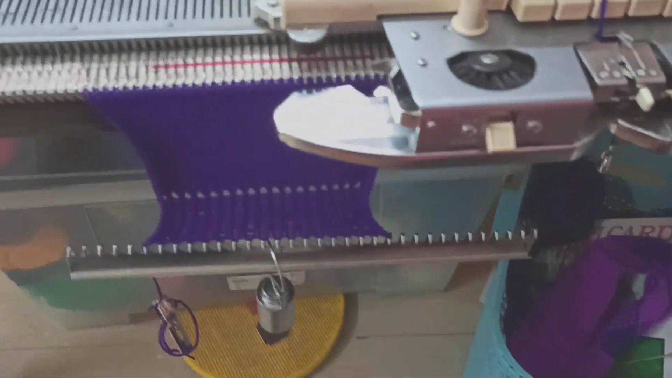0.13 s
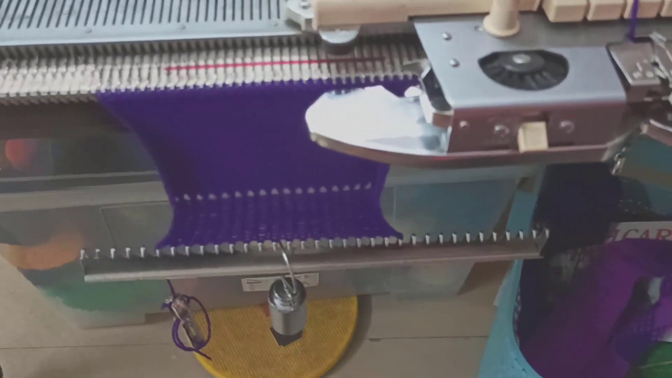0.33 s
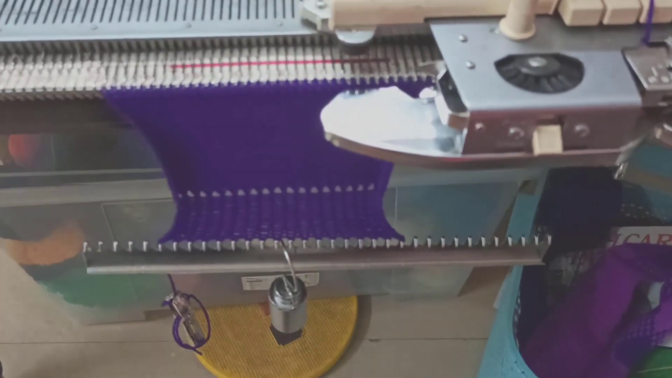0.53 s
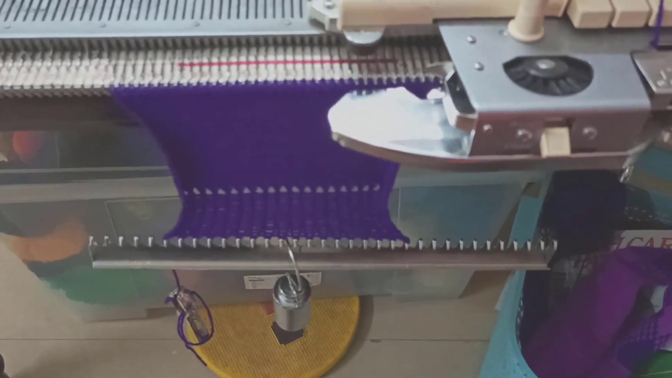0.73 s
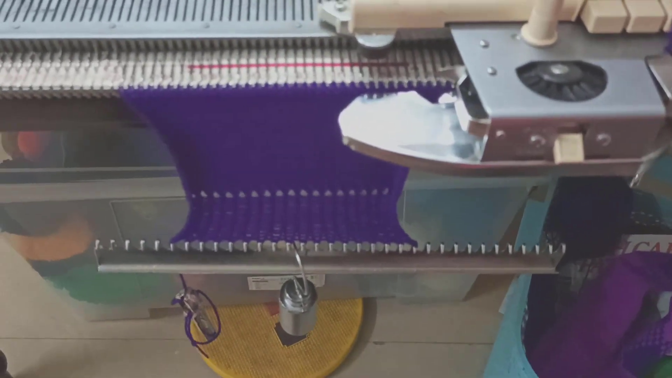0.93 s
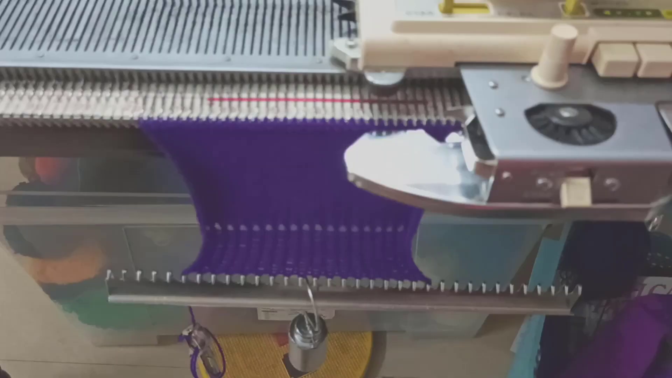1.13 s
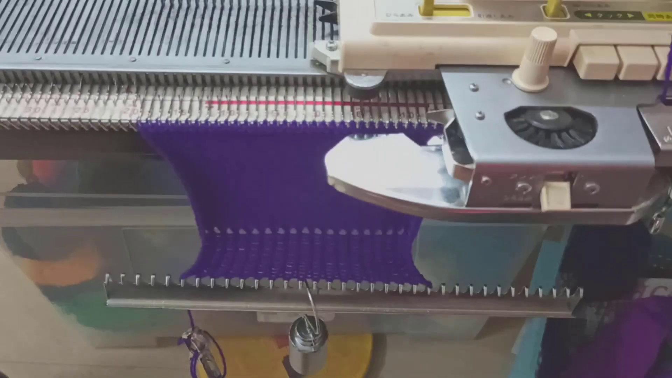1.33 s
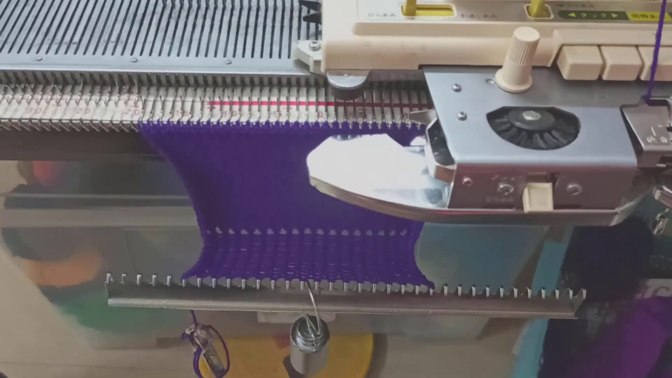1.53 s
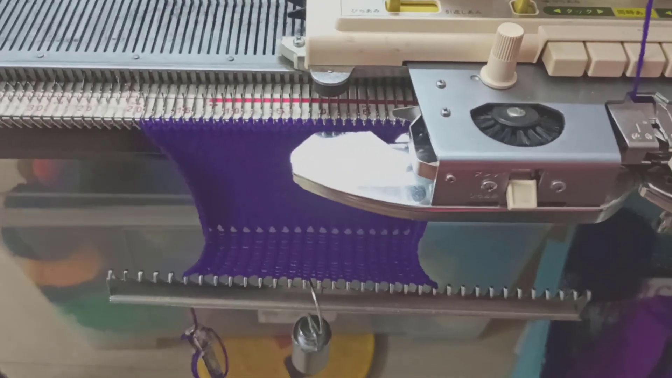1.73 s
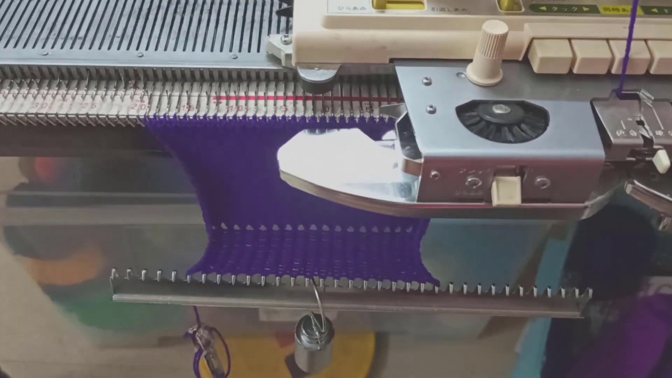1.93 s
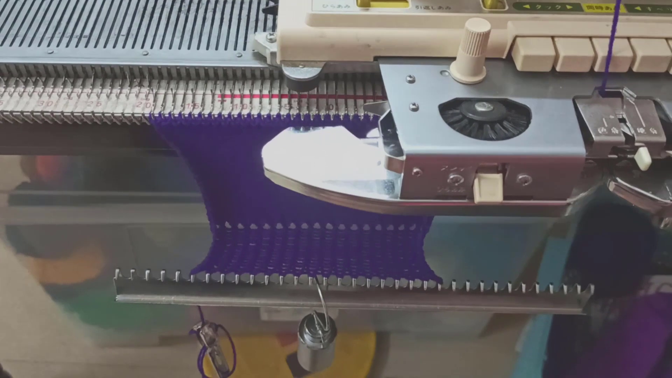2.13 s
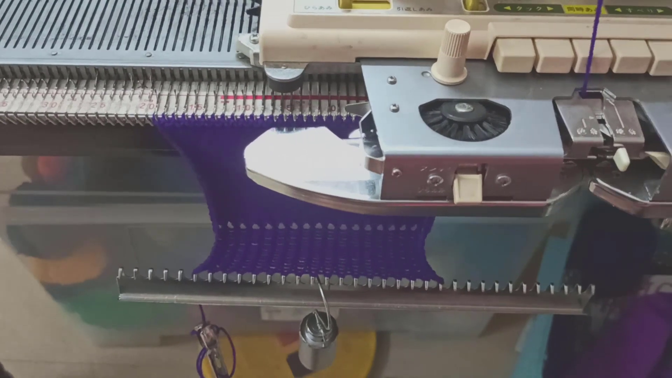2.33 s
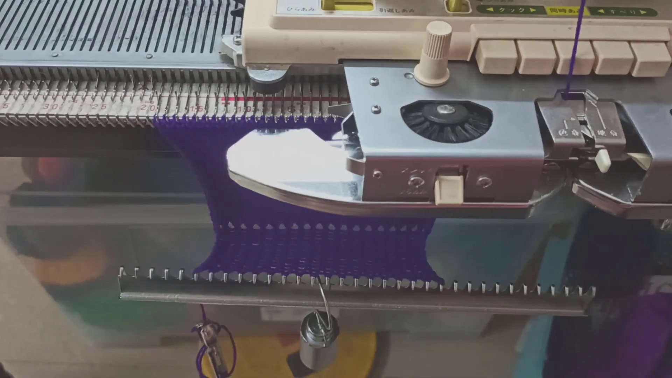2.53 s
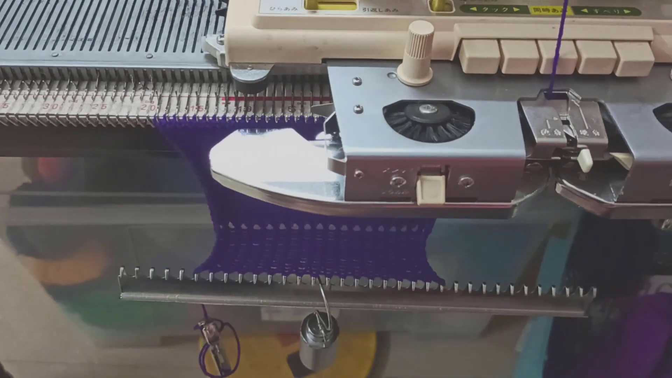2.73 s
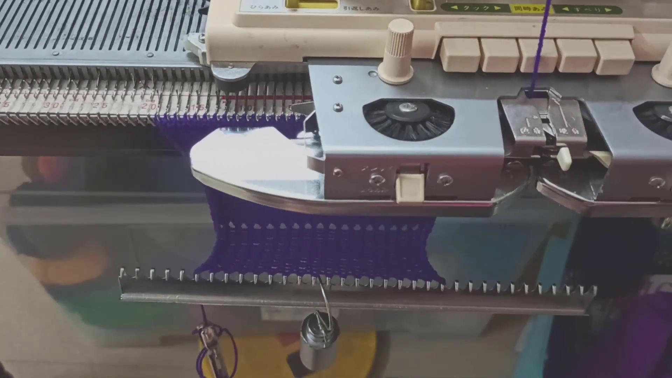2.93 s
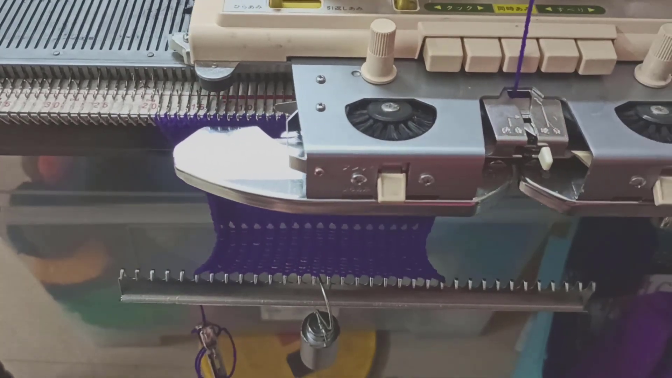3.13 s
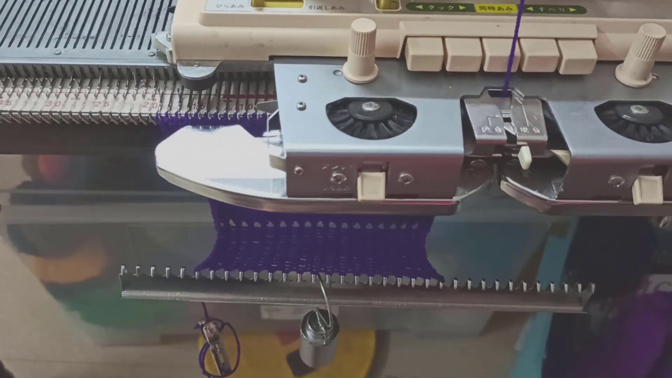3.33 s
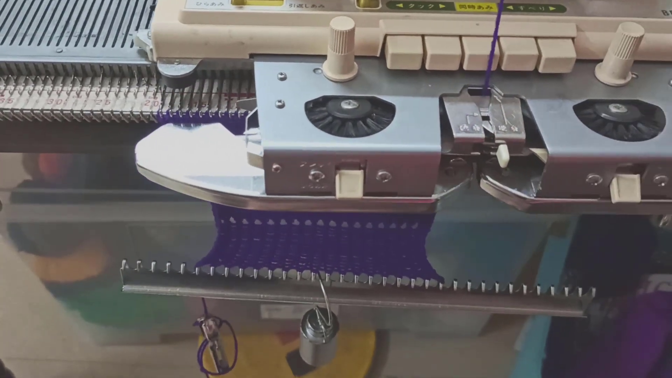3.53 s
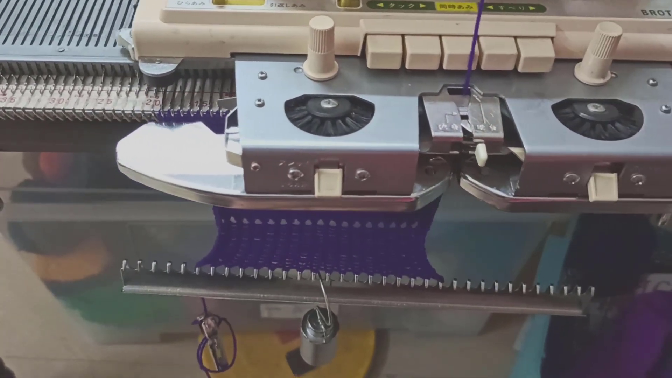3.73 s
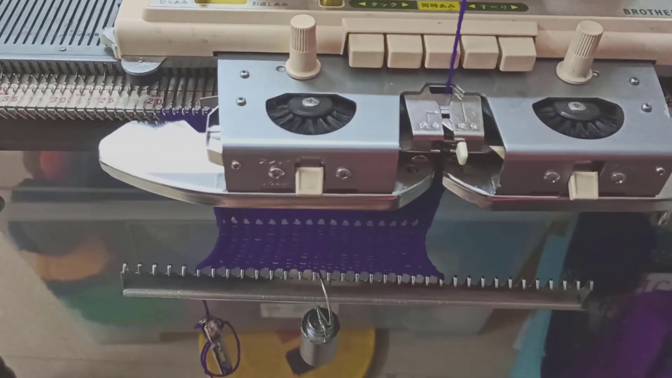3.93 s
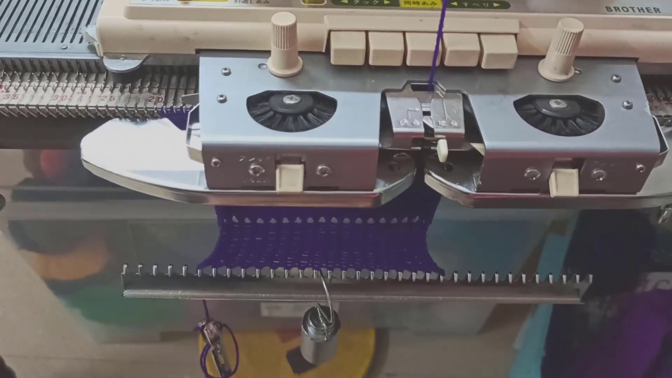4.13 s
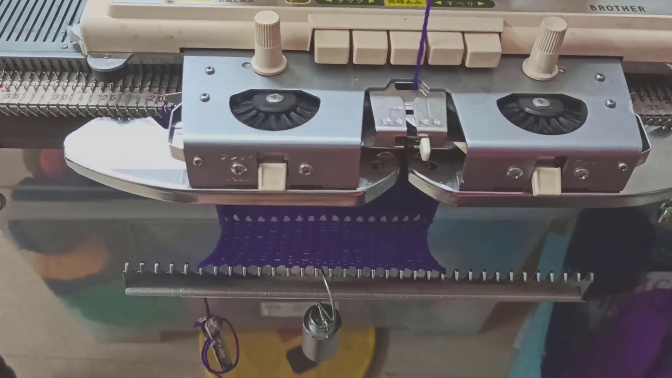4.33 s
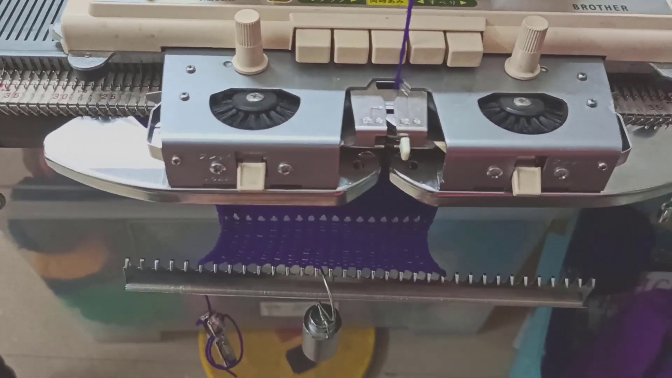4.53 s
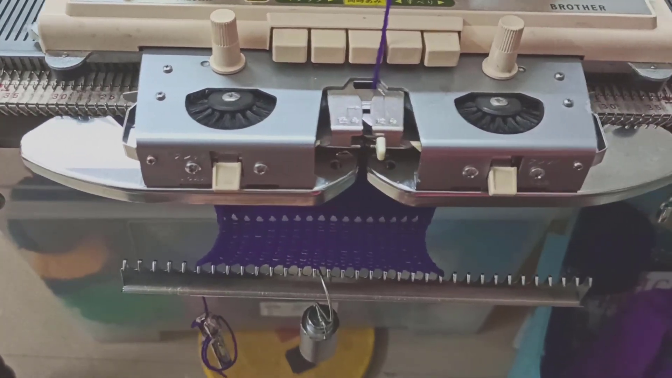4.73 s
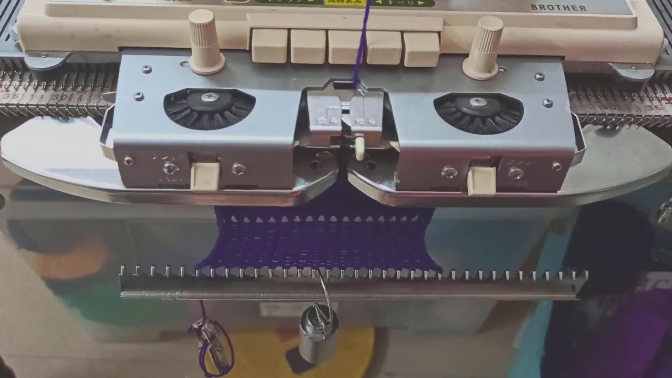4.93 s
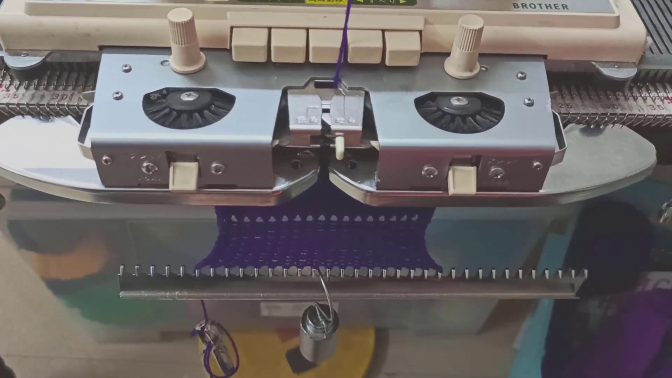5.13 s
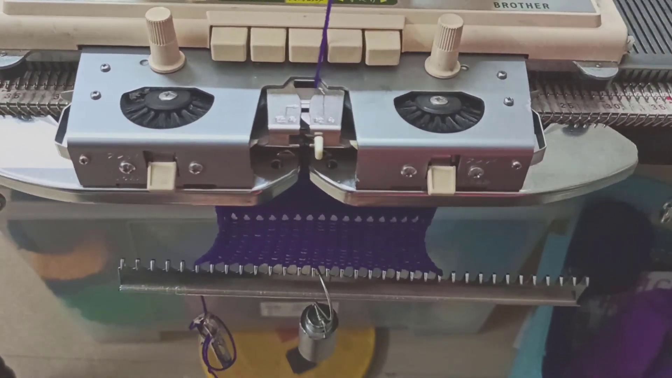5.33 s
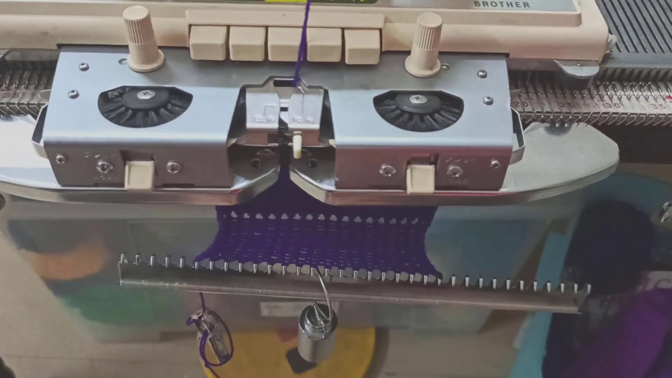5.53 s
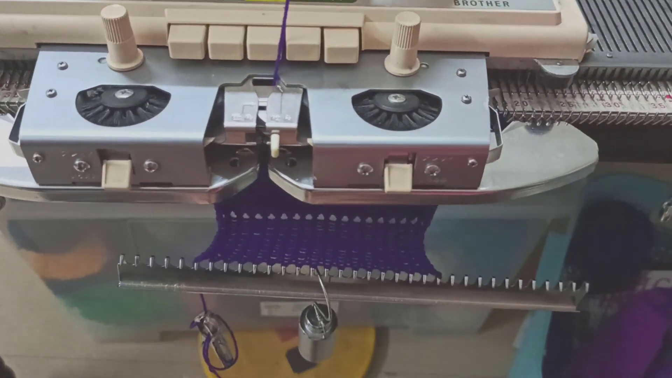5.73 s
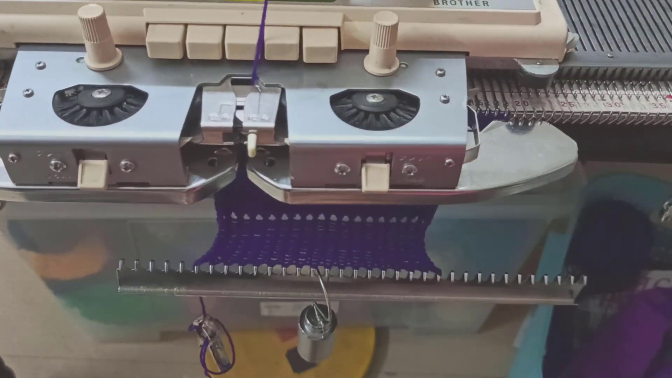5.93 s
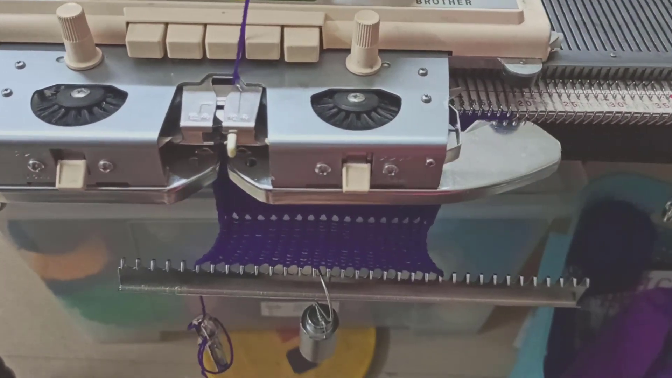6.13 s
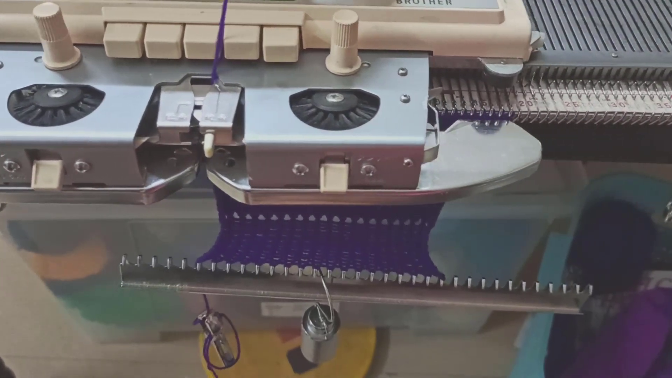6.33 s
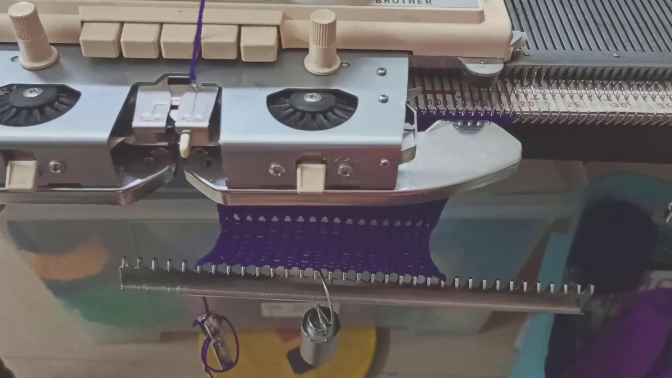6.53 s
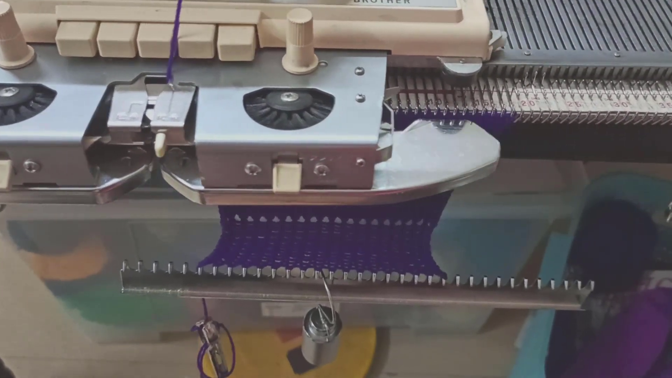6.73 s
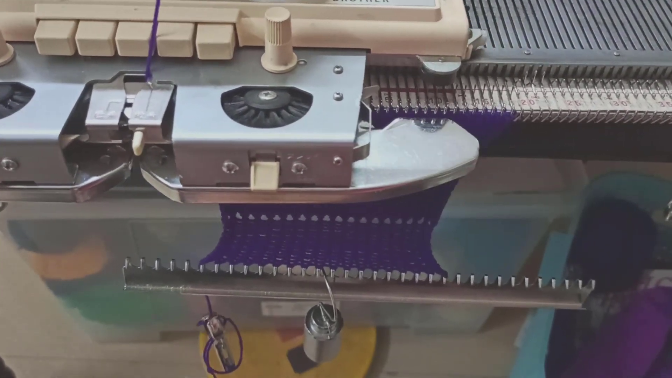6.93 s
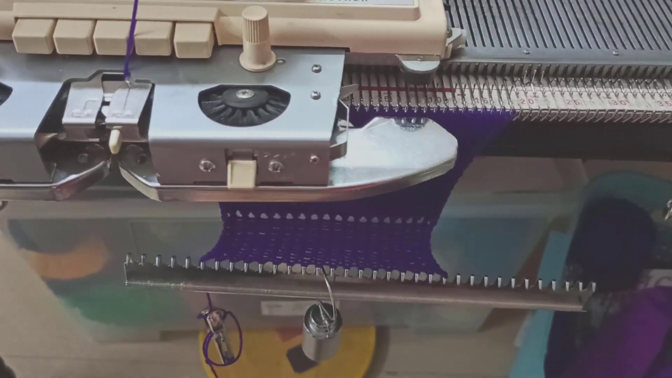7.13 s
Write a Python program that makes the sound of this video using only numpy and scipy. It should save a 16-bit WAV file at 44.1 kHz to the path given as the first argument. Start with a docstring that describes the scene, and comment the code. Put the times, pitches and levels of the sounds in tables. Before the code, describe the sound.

Motorized knitting machine carriage: one sharp clack, brief lull, humming slide with sparse ticks and squeaks, then about ten gritty needle clicks a second.

```python
"""A motor draws a knitting machine's carriage along its steel needle bed in a small room.
A latch snaps and the shell shimmers; the drive coasts to a rest, then rumbles off, swelling about once a second.
Single needles tick at the carriage edge, mostly from 2 s; rail hiss grows and a few friction tones squeak.
From 4.5 s the cams work about ten needles a second: noise tap, gritty scrape, ringing knock, rattle.
Two more latches snap near 6.5 s and faint squeaks return, over needle rustle and room tone."""
import sys
import numpy as np
from scipy import signal
from scipy.fft import rfft, irfft
from scipy.io import wavfile

SR = 44100
rng = np.random.default_rng(int(sys.argv[2]) if len(sys.argv) > 2 else 0)


def dump(signal):
    """Clip the signal to [-1, 1] and save it as 16-bit WAV at the path in sys.argv[1]."""
    limited = np.clip(np.atleast_2d(signal).T, -1, 1)
    pcm = np.round(limited * 32767).astype(np.int16)
    wavfile.write(sys.argv[1], SR, pcm)


N = 317520
TIME = np.arange(N) / SR

# Table levels are relative: the source functions add their own gains.
# needles tapping the cam, then scraping up it: (time [s], tap level [dB], scrape level [dB])
TAPS = [(4.4703, -29.5, -45.5), (4.5704, -32, -42.5), (4.667, -33, -45), (4.762, -32, -46),
        (4.859, -33, -45), (4.959, -30.5, -42.5), (5.053, -38, -41), (5.163, -27.5, -46), (5.253, -33, -45),
        (5.3441, -32, -47), (5.449, -31, -42), (5.5455, -31, -44.5), (5.6255, -28.5, -48),
        (5.736, -38, -45.5), (5.8282, -34, -48), (5.921, -30, -46.5), (6.02, -27.5, -45),
        (6.1204, -31, -48.5), (6.217, -36, -47), (6.3075, -29.5, -48), (6.4112, -32, -44.5),
        (6.4893, -27, -43.5), (6.594, -24, -47), (6.6855, -33, -46), (6.7795, -35, -45), (6.876, -34, -50),
        (6.97, -32, -46), (7.0712, -38, -42.5), (7.1589, -35, -44)]
# stroke-end knocks: (time [s], knock level [dB], ring pitch [Hz], treble [dB], rattle level [dB])
KNOCKS = [(4.5055, -34, 4160, 12, -41.5), (4.607, -31, 4030, 8, -39.5), (4.7003, -26.5, 4340, -3.5, -40),
          (4.795, -25, 4370, 0, -47), (4.898, -25, 4400, 0, -44), (4.9916, -27, 4010, 5.5, -46),
          (5.0921, -28, 4150, 5.5, -43), (5.1882, -27.5, 4700, 5, -50), (5.2831, -27, 4200, 4, -49.5),
          (5.376, -22.5, 3590, 2.5, -42), (5.4747, -30, 4300, 5, -41), (5.5582, -26, 3540, 2, -53),
          (5.6635, -31.5, 3820, 11, -49), (5.7535, -28.5, 3660, 0.5, -48), (5.8428, -29, 4540, 6, -45),
          (5.9379, -31, 3860, -3, -41), (6.0364, -26, 3900, -2, -53), (6.1303, -27.5, 4020, 3.5, -57),
          (6.2295, -26.5, 3930, 0, -46.5), (6.3213, -25, 4100, -0.5, -51), (6.4185, -28, 4070, 2, -42.5),
          (6.5077, -29.5, 4730, 11, -38), (6.6023, -23.5, 4330, -6, -35), (6.6986, -23, 3420, 1.5, -37),
          (6.794, -28.5, 3490, 6, -36), (6.89, -27, 3440, 3, -40), (6.985, -29, 4100, 7, -36.5),
          (7.0815, -30.5, 4160, 9, -40), (7.1768, -28, 4080, 1, -43)]
# rustle of needles, growing as more lie under the cams: (time [s], level [dB])
RUSTLE = [(0.0, -69), (0.36, -78.5), (0.52, -100.5), (1.06, -94.5), (1.36, -82), (1.98, -82), (2.81, -61),
          (3.27, -62.5), (3.43, -55.5), (4.05, -53), (4.32, -52), (4.45, -59.5), (4.69, -49.5), (5.52, -47),
          (6.24, -48), (6.6, -45.5), (7.2, -54)]
# cam work spectrum: (frequency [Hz], left [dB], right [dB])
CAM_COLOUR = [(352, -25.5, -26.5), (567, -22, -27.5), (707, -17.5, -21), (932, -16.5, -15),
              (1350, -35.5, -31.5), (1630, -20.5, -18.5), (2420, -9.5, -10), (2615, -14, -13),
              (3800, -13.5, -1.5), (4747, -16, 0.5), (4640, -13, -10), (5960, -25, -7.5), (6376, -3, 1),
              (8350, -11.5, -22.5), (11740, -17.5, -16), (15300, -9.5, -15)]
# ringing of steel bed and needles: (frequency [Hz], level [dB], t60 [s])
BED_MODES = [(3460, -12, 0.035), (3623, -3, 0.048), (4030, -7.5, 0.035), (4370, -11.5, 0.13),
             (4680, -9, 0.045), (5370, -9.5, 0.02), (6097, -7, 0.057), (7380, -4, 0.025)]
# latches snapping over: (time [s], level [dB], treble [dB], top octave [dB], left-right [dB],
# ring [dB], chatter [s])
LATCHES = [(0.0769, -14.5, -1, -2.5, 1, -19.5, 0.0013), (6.5173, -25.5, 6.5, 6, -27, -16, 0.0036),
           (6.5805, -21, 3, -1, -7.5, -21.5, 0.0049)]
# latch spectrum: (frequency [Hz], left [dB], right [dB])
LATCH_COLOUR = [(350, -22.5, -27), (702, -31, -29), (1180, -24, -14.5), (1650, -15, -20), (1950, 1.5, -13),
                (2440, -13, -16.5), (3160, -18.5, -11), (4003, -13.5, -0.5), (5300, -22, -3.5),
                (5740, -11, -11.5), (6250, -2.5, 2), (7700, 2.5, -8.5), (8160, -17.5, -8),
                (12060, -17.5, -14.5), (14940, -13.5, -17.5)]
# ringing of the carriage shell: (frequency [Hz], level [dB], t60 [s])
SHELL_MODES = [(1885, 3, .5), (1965, 8, .6), (2040, -2, .4), (3850, -9, .35), (4480, -4, .35),
               (6255, -6, .28), (6880, -8, .4), (7165, -7, .4), (7580, 4, .22)]
# loudest single-needle ticks: (time [s], level [dB], hardness as top octave [dB])
TICKS = [(0.4666, -45.5, -5), (1.196, -46, -19.5), (1.7394, -44.5, -26), (2.0867, -51.5, -13),
         (2.133, -57, -14), (2.1889, -48, -20), (2.2285, -50, -17), (2.2844, -47, -16),
         (2.2916, -49.5, 4.5), (2.378, -40.5, -10), (2.4053, -53.5, 14), (2.5551, -36.5, -4),
         (2.6596, -33, -10), (2.761, -43.5, -9), (2.77, -34, -3), (2.8653, -32.5, -3), (2.9784, -35.5, 0),
         (3.0376, -38.5, -8), (3.2192, -35, 4), (3.2794, -35, -16), (3.3232, -37.5, 1.5), (3.432, -37, 0),
         (3.4647, -38, -5), (3.5366, -34, 4), (3.5592, -37.5, 1), (3.6606, -37.5, -1), (3.7586, -34, 0.5),
         (3.802, -31, -4), (3.8593, -34, -2), (3.941, -37, -9), (3.966, -41, -1.5), (4.0239, -33, 0.5),
         (4.0687, -36.5, -1.5), (4.139, -32, -0.5), (4.218, -36, 2.5), (4.277, -28.5, -21),
         (4.2895, -40.5, 6), (4.3155, -33, -4), (4.3928, -36, -15), (5.067, -40, 1), (5.081, -42, -1),
         (6.105, -38.5, -5), (7.100, -34.5, -2.5)]
# tick spectrum: (frequency [Hz], left [dB], right [dB])
TICK_COLOUR = [(500, -46, -32), (1380, -40, -51), (2120, -16, -33), (3360, -16.5, -11.5),
               (4550, -29.5, -7.5), (6190, -14.5, -13.5), (6270, -7, 0), (7670, -22, -50),
               (12000, -20, -21), (13800, -5.5, -14), (15400, -20, -7)]
# squeaks, each a list of points on one unbroken glide: (time [s], pitch [Hz], level [dB])
SQUEAKS = [
    [(1.93, 1853, -75.5), (2.025, 2055, -68.5), (2.05, 1980, -62), (2.08, 1800, -66), (2.105, 1660, -59),
     (2.145, 1800, -69), (2.2, 1635, -60.5), (2.245, 1600, -70), (2.28, 1635, -58), (2.33, 1603, -73),
     (2.44, 1670, -59.5), (2.475, 1702, -52), (2.55, 1816, -62.5), (2.58, 1810, -78)],
    [(2.765, 1720, -74), (2.78, 1760, -61), (2.85, 1970, -62.5), (2.93, 2110, -66)],
    [(3.15, 1850, -76), (3.28, 1760, -73), (3.48, 1700, -73)],
    [(3.603, 1580, -71), (3.614, 1560, -48.5), (3.629, 1535, -54), (3.639, 1567, -74), (3.652, 1582, -53),
     (3.68, 1560, -74)],
    [(3.712, 1470, -55), (3.738, 1562, -43.5), (3.748, 1595, -36.5), (3.765, 1703, -38.5),
     (3.79, 1760, -43), (3.82, 1772, -39.5), (3.835, 1815, -53), (3.885, 1750, -62)],
    [(6.66, 1740, -65), (6.732, 1620, -59), (6.748, 1628, -41.5), (6.772, 1757, -40), (6.795, 1680, -37.5),
     (6.845, 1670, -52), (6.855, 1680, -64)],
    [(6.825, 1850, -57), (6.86, 2080, -42), (6.885, 2200, -56)],
]
# light touch rough, firm touch locked on pitch: (level [dB], waver [share of pitch])
SQUEAK_WAVER = [(-66, .055), (-58, .036), (-49, .018)]
# a rubbed needle singing: (time [s], pitch [Hz], level [dB], length [s])
SINGING = [(0.466, 4020, -46.5, 0.006), (2.37, 4340, -59.5, 0.16), (3.536, 6470, -39, 0.016),
           (3.556, 4300, -58, 0.1), (3.74, 4370, -54.5, 0.33), (4.683, 4330, -49, 0.14),
           (4.838, 4344, -50, 0.24), (5.08, 4360, -55, 0.26), (5.398, 4324, -51.5, 0.13),
           (5.625, 6140, -37.5, 0.018), (5.718, 6300, -36.5, 0.013), (5.808, 6250, -39, 0.013),
           (6.175, 6250, -46, 0.024), (6.933, 6200, -41, 0.014)]
# dull knocks of the casing: (time [s], level [dB])
CASING_KNOCKS = [(1.063, -61), (4.279, -52.5), (4.325, -59), (4.506, -57.5), (4.607, -66.5), (6.321, -60),
                 (6.582, -52), (6.602, -56)]
# casing spectrum: (frequency [Hz], left [dB], right [dB])
CASING_COLOUR = [(60, -15, -26), (250, -17, -16.5), (526, 0.5, 5.5), (610, -13, -17), (870, 2, 4),
                 (1170, 6, 4.5), (1430, -26, -5.5), (3100, -8, 2), (8000, -42, -56)]
# hiss of carriage on rail, rising until under way: (time [s], level [dB])
RAIL_HISS = [(0.0, -61.5), (0.33, -65), (0.57, -92), (1.07, -80), (1.25, -76), (1.68, -66.5), (2.95, -64),
             (3.2, -62.5), (3.6, -60.5)]
# rail spectrum: (frequency [Hz], left [dB], right [dB])
RAIL_COLOUR = [(385, -12, -15.5), (566.4, -18.5, -19), (709, -9, -11.5), (1100, -8, -10.5),
               (1370, -16, -17.5), (1770, -5, -6), (3140, -18.5, 0), (4110, -23.5, -1), (4496, -11, 6),
               (4820, -38.5, -9.5), (6520, -26, -21), (8100, -38.5, -35), (13930, -44, -29)]
# short rubs of the sliding carriage: (time [s], length [s], centre [Hz], level [dB])
RUBS = [(0.722, 0.13, 776, -71), (1.343, 0.13, 3500, -66), (1.586, 0.12, 860, -69),
        (2.178, 0.18, 790, -70.5), (2.387, 0.075, 4260, -55), (2.737, 0.19, 286, -64.5)]
# drive rumble as its load changes: (time [s], level [dB])
LOAD = [(0, -62), (1.2, -61.5), (1.9, -62.5), (2.4, -64.5), (3.0, -59), (3.6, -63), (4.6, -59), (5.4, -64),
        (6.2, -61), (7.2, -65.5)]
# motor hum: (frequency [Hz], level against rumble [dB])
HUM = [(121, -14.5), (200, -10)]
# rumble spectrum: (frequency [Hz], left [dB], right [dB])
RUMBLE_COLOUR = [(25, -22.5, -23), (50, -24.5, -27), (79.6, -4.5, -16), (98, -1.5, -6), (123.3, 4, -1.5),
                 (151, -4, -9), (196.8, 0.5, -2.5), (258.5, -10.5, -14.5), (350, -21.5, -21),
                 (507.6, -31.5, -30), (1503, -54.5, -58)]
# dull thuds of the frame: (time [s], level [dB], pitch [Hz], length [s])
THUDS = [(3.980, -49, 124, 0.18), (4.578, -52, 77.6, 0.07), (4.587, -51, 125, 0.062),
         (5.730, -61, 72, 0.07)]
# room tone spectrum: (frequency [Hz], left [dB], right [dB])
ROOM_COLOUR = [(24.8, -39.5, -33.5), (61, -16.5, -21), (118, -1, -9.5), (236, -1.5, -5.5),
               (418, -15.5, -13.5), (1153, -9, -14.5), (1300, -27.5, -21.5), (2100, -20.5, -14),
               (2780, -36, -18.5), (4560, -42.5, -21), (5000, -43, -49.5), (7700, -42, -43.5),
               (14000, -55, -63)]
# microphone response, deaf around 10 kHz: (frequency [Hz], gain [dB])
MICROPHONE = [(8400, 0), (8600, -5.5), (8900, -33), (9450, -30.5), (10100, -21), (11200, -43.5), (11600, 3),
              (15500, -5.5), (15900, -28.5)]

TAP_DB = -8.0
KNOCK_RING_DB, KNOCK_RING_T60_S = -3, 0.035
BOUNCE_S, BOUNCE_LOSS_DB = 0.005, 8.5   # one bounce per knock; nominal delay
THUMP_DB = -36.5   # casing blow against its knock
SWELL_DB, SWELL_PERIOD_S, SWELL_PEAK_S = 1, 0.934, 1.973
REST_FROM_S, REST_UNTIL_S, REST_DROP_DB = 0.39, 1.017, 14.5
COAST_S, RESTART_S = 0.32, 0.098
ROOM_T60_S = 0.27
CUTOFF_HZ = 16400


def from_db(db):
    """Decibels to gain."""
    return 10 ** (np.asarray(db) / 20)


def rms_one(x):
    """Scales to unit power."""
    return x / np.sqrt(np.mean(x ** 2) + 1e-20)


def in_time(rows):
    """The columns of a curve, sample by sample."""
    s, *columns = np.transpose(rows)
    return [np.interp(TIME, s, c) for c in columns]


def convolve(x, response):
    """Filters each side by an impulse response, cut to the scene's length."""
    return signal.oaconvolve(np.atleast_2d(x), np.atleast_2d(response), axes=1)[:, :N]


def unit_energy(response):
    """Scales a response to unit energy, averaged over its sides."""
    return response / np.sqrt(np.mean(np.sum(response ** 2, axis=-1)))


def response_of(table, size=8192):
    """Causal (minimum-phase) impulse response for each dB column of a spectrum."""
    hz, *columns = np.transpose(table)
    log_hz = np.log(np.maximum(np.fft.rfftfreq(size, 1 / SR), 1))
    gains_db = [np.interp(log_hz, np.log(hz), c) for c in columns]
    cepstrum = irfft(np.log(from_db(gains_db)))
    # fold the cepstrum onto positive time
    cepstrum[:, 1:size // 2] *= 2
    cepstrum[:, size // 2 + 1:] = 0
    return irfft(np.exp(rfft(cepstrum)))


def colour(x, table):
    """Gives white sound a spectrum and keeps its power."""
    return convolve(x, unit_energy(response_of(table)))


def drift(turns_per_s):
    """Smooth random curve of unit power."""
    knots = rng.standard_normal(int(N / SR * turns_per_s) + 2)
    return rms_one(np.interp(TIME * turns_per_s, np.arange(len(knots)), knots))


def stereo_noise(alike_below_hz):
    """White noise that both sides share in the bass and not in the treble."""
    shared, left, right = rng.standard_normal((3, N))
    split_hz = min(alike_below_hz, SR / 3)
    low = signal.butter(1, split_hz, "low", fs=SR)
    high = signal.butter(1, split_hz, "high", fs=SR)
    return signal.lfilter(*low, shared) + signal.lfilter(*high, np.array([left, right]))


def unsteady_sine(hz, waver, wavers_per_s):
    """A sine following the pitches `hz`, sample by sample, with a random waver."""
    place = TIME[:len(hz)] * wavers_per_s
    knots = rng.standard_normal(size=4000)
    wavering_hz = hz * (1 + waver * np.interp(place, np.arange(len(knots)), knots))
    return np.sin(2 * np.pi * np.cumsum(wavering_hz) / SR)


def contacts(rows, hold_s, decay_s, attack_s=0.0013):
    """Contacts (time [s], level, treble, top octave, left-right [dB]): noise chatters briefly and dies."""
    out, age_s = np.zeros((2, N)), TIME[:SR // 16]
    shape = np.minimum(age_s / attack_s, 1) * np.exp(-np.maximum(age_s - hold_s, 0) / decay_s)
    hz = np.fft.rfftfreq(len(age_s), 1 / SR)
    alike = 1 / (1 + (hz / 1900) ** 2)      # long waves reach both sides alike
    for s, db, treble_db, top_db, pan_db in rows:
        shared, *own = rfft(rng.standard_normal((3, len(age_s))))
        hardness_db = np.interp(hz, [4800, 6000, 9000, 11500], [0, treble_db, treble_db, top_db])
        mixed = np.sqrt(alike) * shared + np.sqrt(1 - alike) * np.array(own)
        chatter = irfft(from_db(hardness_db) * mixed, len(age_s))
        sides = rms_one(from_db([[pan_db], [0]]))
        at = min(int(s * SR), N)
        out[:, at:at + len(age_s)] += (from_db(db) * sides * shape * chatter)[:, :N - at]
    return out


def ringing(x, modes):
    """Struck steel rings on in its modes, which reach each side with a phase of their own."""
    age_s = TIME[:SR // 2]
    response = np.zeros((2, len(age_s)))
    for hz, db, t60_s in modes:
        fade = from_db(db - 60 * age_s / t60_s)
        response += fade * np.sin(2 * np.pi * (hz * age_s + rng.random((2, 1))))
    return convolve(x, unit_energy(response))


def diffuse(x, t60_s):
    """A dense tail of reflections, different at each side."""
    age_s = TIME[:SR]
    tail = rng.standard_normal((2, SR)) * from_db(-60 * age_s / t60_s) * (age_s > .003)
    return convolve(x, unit_energy(tail))


def friction(grain_db, grains_per_s):
    """Steel rubbing on steel: noise broken up by tiny catches."""
    return rms_one(stereo_noise(alike_below_hz=1400) * from_db(grain_db * drift(grains_per_s)))


def grit(catches_per_s, spread_db):
    """Separate tiny catches of uneven size, at unit power."""
    caught = rng.random(N) < catches_per_s / SR
    size = from_db(spread_db * np.minimum(rng.exponential(1, N), 3))
    return rms_one(caught * size * rng.standard_normal((2, N)))


def shifting(x, top_hz, patchy_db, turns_per_s, count=14):
    """The contact point keeps moving, so each band of a scrape comes and goes on its own."""
    hz, spectrum, out = np.fft.rfftfreq(N, 1 / SR), rfft(x), 0
    place = np.minimum(hz / top_hz, 1) * (count - 1)
    for k in range(count):
        band = irfft(spectrum * np.maximum(1 - np.abs(place - k), 0), N)
        out = out + band * from_db(patchy_db * drift(turns_per_s))
    return rms_one(out)


def cam_strokes(rustle_db, swell_db=7.5, release_s=0.029, knock_db=-9.0):
    """Each needle taps the cam, scrapes up it, knocks and rattles back, over the others' rustle."""
    pressure = np.zeros(N)
    for (start_s, _, scrape_db), (end_s, *_, rattle_db) in zip(TAPS, KNOCKS):
        span = slice(int(start_s * SR), int(end_s * SR) + SR // 8)
        t = TIME[span]
        climb = np.minimum((t - start_s) / (end_s - start_s), 1)
        scrape = from_db(scrape_db + swell_db * climb)
        rattle = from_db(rattle_db) * np.exp((end_s - t) / release_s)
        pressure[span] += np.where(t < end_s, scrape, rattle)
    scrapes = pressure * from_db(-0.5) * scraping(catches_per_s=1800)

    tap_rows = [(s, db + TAP_DB, 1.0, 0.5, -1.0) for s, db, _ in TAPS]
    taps = contacts(tap_rows, hold_s=0.0011, decay_s=0.0054)

    knock_rows = []
    for s, db, _, treble_db, _ in KNOCKS:
        bounce_s = BOUNCE_S * rng.uniform(.7, 1.5)
        for delay_s, loss_db in ((0, 0), (bounce_s, BOUNCE_LOSS_DB)):
            knock_rows.append((s + delay_s, db + knock_db - loss_db, treble_db, treble_db, 1.5))
    knocks = contacts(knock_rows, hold_s=0.0025, decay_s=0.0033)

    rustle = from_db(rustle_db) * (from_db(0.5) * scraping(catches_per_s=2200) + loose_latches())
    force = scrapes + taps + knocks + rustle
    direct = colour(force, CAM_COLOUR)
    rings = from_db([[-13], [-6]]) * needle_modes(force, variety_db=3.0)
    return direct + from_db(-4.5) * diffuse(direct, ROOM_T60_S) + rings + knock_rings()


def scraping(catches_per_s):
    """Needles dragging in their slots: fine friction and clumped gritty catches of changing colour."""
    fine = from_db(-3) * friction(grain_db=1.5, grains_per_s=600)
    clumps = from_db(2.8 * drift(200))
    rubbing = (fine + grit(catches_per_s, spread_db=1.5)) * clumps
    return shifting(rubbing, top_hz=8500, patchy_db=3.0, turns_per_s=90)


def loose_latches(clicks_per_s=110, decay_s=0.0011, spread_db=2.5):
    """The needles' tiny latches flap at random: fine dry clicks of uneven size."""
    flaps = (rng.random(N) < clicks_per_s / SR) * from_db(spread_db * rng.uniform(-1, 1, N))
    envelope = convolve(flaps, np.exp(-TIME[:SR // 50] / decay_s))
    return from_db(-4) * rms_one(envelope * stereo_noise(alike_below_hz=1500))


def needle_modes(force, variety_db):
    """Force drives two-pole resonators at the bed's modes, whose strengths drift from needle to needle."""
    out = np.zeros((2, N))
    for hz, db, t60_s in BED_MODES:
        r, w = from_db(-60 / (t60_s * SR)), 2 * np.pi * hz / SR
        feed = [np.sin(w) * np.sqrt(1 - r * r)]
        driven = force * from_db(db + variety_db * drift(14))
        out += signal.lfilter(feed, [1, -2 * r * np.cos(w), r * r], driven)
    return out


def knock_rings():
    """Every needle rings briefly at a pitch of its own when it knocks home."""
    out, age_s = np.zeros((2, N)), TIME[:SR // 10]
    attack = np.minimum(age_s / 0.0013, 1)
    for s, db, hz, *_ in KNOCKS:
        at = int(s * SR)
        fade = attack * from_db(db + KNOCK_RING_DB - 60 * age_s / KNOCK_RING_T60_S)
        ring = fade * np.sin(2 * np.pi * (hz * age_s + rng.random((2, 1))))
        out[:, at:at + len(age_s)] += ring[:, :N - at]
    return from_db([[-7], [0]]) * out


def latches():
    """A hard snap of chattering noise, after which the whole carriage shell shimmers."""
    snap, shake_rows = np.zeros((2, N)), []
    for s, db, treble_db, top_db, pan_db, ring_db, chatter_s in LATCHES:
        row = (s, db, treble_db, top_db, pan_db)
        snap += contacts([row], hold_s=chatter_s, decay_s=0.002, attack_s=chatter_s / 3)
        shake_rows.append((s, db + ring_db, treble_db, top_db, 0))
    shake = contacts(shake_rows, hold_s=0.0018, decay_s=0.0045)
    shimmer = colour(from_db(14.5) * diffuse(shake, t60_s=0.38), LATCH_COLOUR)
    return colour(snap, LATCH_COLOUR) + shimmer + from_db(-5.5) * ringing(shake, SHELL_MODES)


def needle_ticks(treble_db=3.0, treble_share=0.8, top_db=-1.5, pan_db_per_s=1.5, centred_s=5.4,
                 rattle_db=-15.0, rattle_s=0.063, count=2):
    """Needle butts meet the carriage edge and rattle after; harder is brighter; ticks move left."""
    rows, rattles = [], []
    for s, db, hard_db in TICKS:
        pan_db = pan_db_per_s * (s - centred_s)
        rows.append((s, db, treble_db + treble_share * hard_db, top_db + hard_db, pan_db))
        for place in rng.uniform(.1, 1, count):
            rattles.append((s + rattle_s * place, db + rattle_db, 0, -4, 0))
    hits = contacts(rows, hold_s=0.0028, decay_s=0.0015)
    taps = from_db(2.5) * (hits + contacts(rattles, hold_s=0.0015, decay_s=0.001))
    direct = colour(taps, TICK_COLOUR)
    return direct + from_db(-3.5) * diffuse(direct, ROOM_T60_S) + from_db(-17) * ringing(taps, BED_MODES)


def squeaks(flutter_db=2.3, scratch_db=0.96, right_lag_s=0.00011):
    """Thin gliding tones, rough when faint and clean when firm; the room makes them beat and linger."""
    tone = np.zeros(N)
    for glide in SQUEAKS:
        s, hz, db = np.transpose(glide)
        span = slice(int(s[0] * SR), int(s[-1] * SR))
        hz, db = np.interp(TIME[span], s, hz), np.interp(TIME[span], s, db)
        waver = np.interp(db, *np.transpose(SQUEAK_WAVER))
        tone[span] += from_db(db) * unsteady_sine(hz, waver, wavers_per_s=320)
    tone = tone * from_db(flutter_db * drift(110) + scratch_db * drift(700))
    direct = np.array([tone, np.interp(TIME - right_lag_s, TIME, tone)])
    return direct + from_db(-1.5) * diffuse(tone, t60_s=.42)


def singing():
    """Friction keeps one needle mode going: a thin ring that swells quickly and fades."""
    out = np.zeros(N)
    for s, hz, db, length_s in SINGING:
        at, phase = int(s * SR), np.linspace(0, 1, int(length_s * SR))
        swell = np.sin(np.pi * np.sqrt(phase))
        ring = unsteady_sine(np.full(len(phase), hz), waver=0.004, wavers_per_s=500)
        out[at:at + len(phase)] += (from_db(db) * swell * ring)[:N - at]
    out = out * from_db(2 * drift(45) - 1)
    return from_db([[-3], [4]]) * (out + from_db(-12) * diffuse(out, t60_s=0.4))


def casing():
    """The plastic casing thumps lightly with every knock and takes the harder jolts."""
    jolts = [*CASING_KNOCKS, *((s, db + THUMP_DB) for s, db, *_ in KNOCKS)]
    blows = contacts([(s, db, -10, -10, 0) for s, db in jolts], hold_s=0.0024, decay_s=0.023)
    return from_db(4.5) * colour(blows, CASING_COLOUR)


def rail(hiss_db, gain_db=3.5, uneven_db=1.0):
    """The carriage slides on its rail with a grainy, uneven hiss whose colour drifts."""
    rubbing = friction(grain_db=2.5, grains_per_s=140)
    sliding = shifting(rubbing, top_hz=5000, patchy_db=2.3, turns_per_s=13)
    return from_db(hiss_db + gain_db + uneven_db * drift(16)) * colour(sliding, RAIL_COLOUR)


def rubs(width_octaves=0.55):
    """The carriage catches lightly as it slides: short grainy rubs of band-limited friction."""
    out, grains = np.zeros((2, N)), friction(grain_db=1.5, grains_per_s=100)
    half = 2 ** (width_octaves / 2)
    for s, length_s, hz, db in RUBS:
        at, phase = int(s * SR), np.linspace(0, 1, int(length_s * SR))
        span = slice(at, at + len(phase))
        bandpass = signal.butter(2, [hz / half, hz * half], "band", fs=SR, output="sos")
        band = signal.sosfilt(bandpass, grains[:, span])
        out[:, span] += from_db(db) * np.sin(np.pi * np.sqrt(phase)) * rms_one(band)
    return from_db([[-3], [1.5]]) * out


def drive(rumble_db):
    """Motor and belt hum and rumble through the frame, which now and then thuds."""
    hum = np.zeros(N)
    for hz, db in HUM:
        tone = unsteady_sine(np.full(N, float(hz)), waver=.025, wavers_per_s=27)
        hum += from_db(db + 3 * drift(5.6)) * tone
    rumble = colour(stereo_noise(alike_below_hz=700), RUMBLE_COLOUR)
    out = from_db(rumble_db) * (rumble + from_db([[1.5], [-2.5]]) * hum)
    for s, db, hz, length_s in THUDS:
        swell = np.sin(np.pi * np.clip((TIME - s) / length_s, 0, 1))
        out = out + from_db(db) * swell * np.sin(2 * np.pi * hz * TIME)
    return out


def drive_level(start_up_db=2.0, start_up_s=0.3, wander_db=1.25):
    """Rumble level [dB]: load, regular swell, a rest, and extra effort while stopping and starting."""
    coasting = (TIME - REST_FROM_S) / COAST_S
    restarting = (TIME - REST_UNTIL_S) / RESTART_S
    resting = np.clip(np.minimum(coasting, 1 - restarting), 0, 1)
    swell_db = SWELL_DB * np.cos(2 * np.pi * (TIME - SWELL_PEAK_S) / SWELL_PERIOD_S)
    swell_db = swell_db + wander_db * drift(9)
    from_rest_s = np.maximum(np.maximum(REST_FROM_S - TIME, TIME - REST_UNTIL_S), 0)
    effort_db = start_up_db * np.exp(-(from_rest_s / start_up_s) ** 2)
    load_db, = in_time(LOAD)
    return load_db + (1 - resting) * (swell_db + effort_db) - resting * REST_DROP_DB


def room_tone():
    """Quiet room: steady coloured noise, shared by both sides in the bass."""
    return from_db(-66.5) * colour(stereo_noise(alike_below_hz=430), ROOM_COLOUR)


def scene():
    """Steel parts, casing and drive over the quiet room."""
    (hiss_db,), (rustle_db,), rumble_db = in_time(RAIL_HISS), in_time(RUSTLE), drive_level()
    hiss_db = np.maximum(hiss_db, rumble_db - 8.0)   # a loaded carriage always rubs its rail
    steel = cam_strokes(rustle_db - 1.0) + latches() + needle_ticks() + rail(hiss_db) + rubs()
    highpass = signal.butter(2, 230, "high", fs=SR, output="sos")
    steel = signal.sosfilt(highpass, steel)   # small parts radiate no bass
    return steel + squeaks() + singing() + casing() + drive(rumble_db) + room_tone()


def record(dry):
    """The microphone's colour, then a steep cut of the top."""
    heard = convolve(dry, response_of(MICROPHONE))
    lowpass = signal.cheby2(16, 70, CUTOFF_HZ + 500, fs=SR, output="sos")
    return signal.sosfilt(lowpass, heard)


dry = scene()
out = record(dry)
dump(out)
```